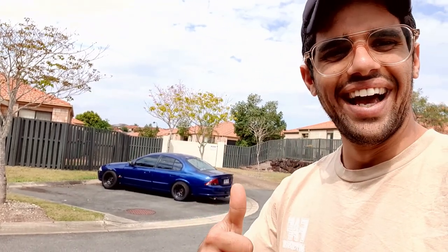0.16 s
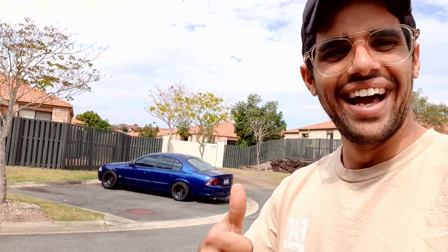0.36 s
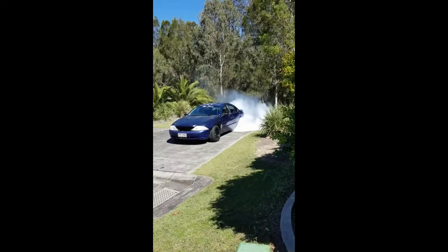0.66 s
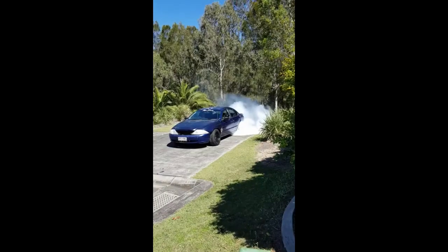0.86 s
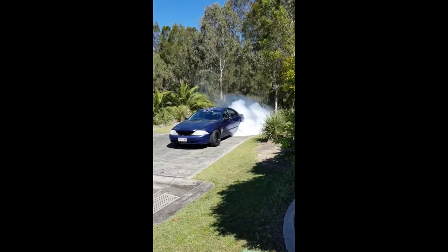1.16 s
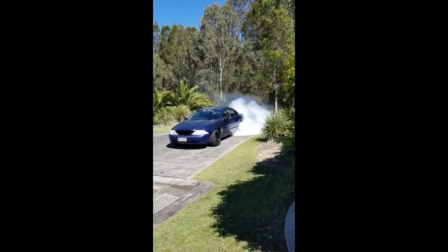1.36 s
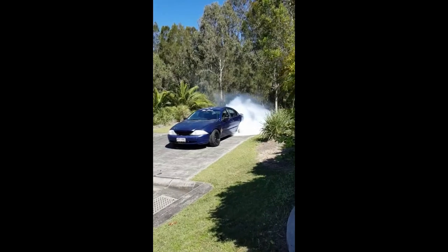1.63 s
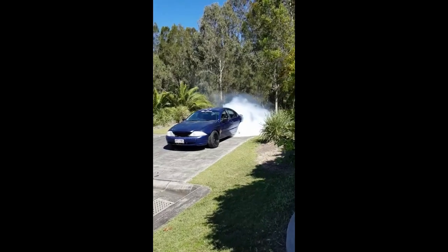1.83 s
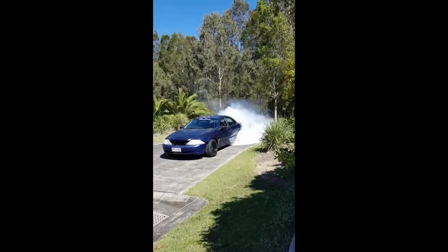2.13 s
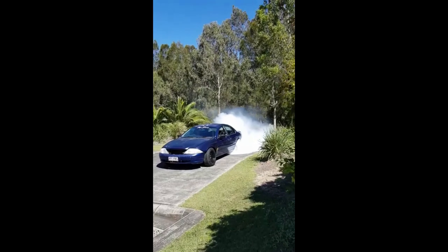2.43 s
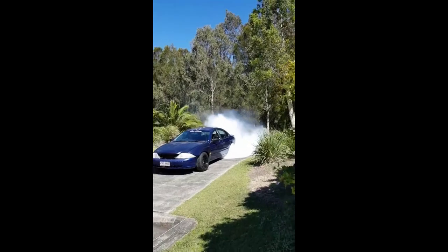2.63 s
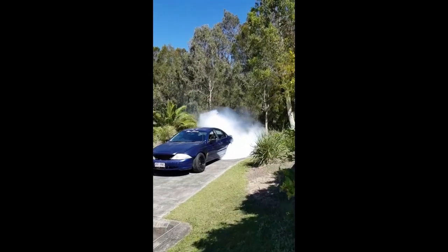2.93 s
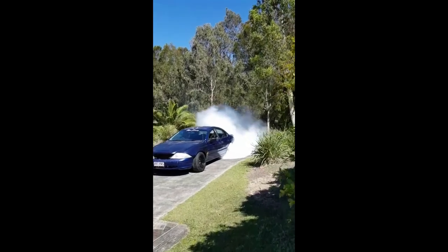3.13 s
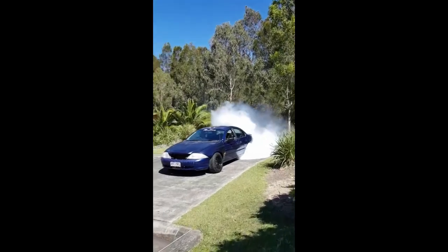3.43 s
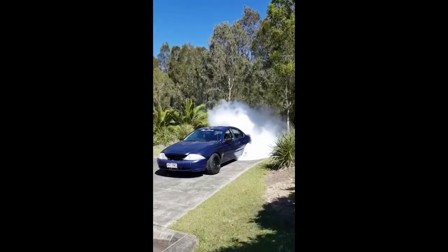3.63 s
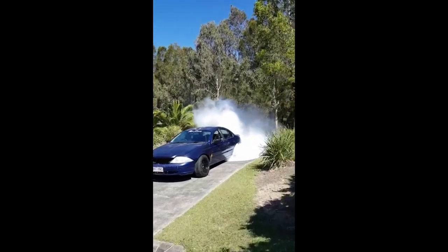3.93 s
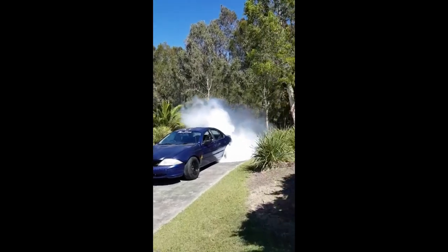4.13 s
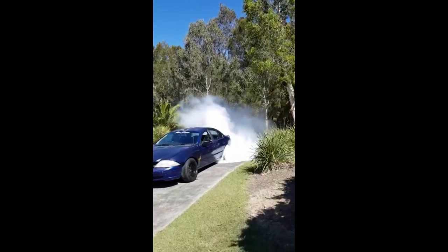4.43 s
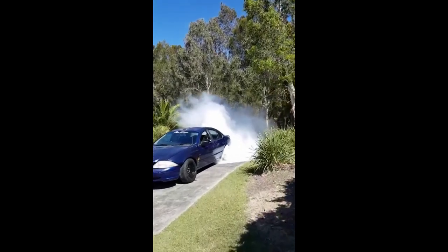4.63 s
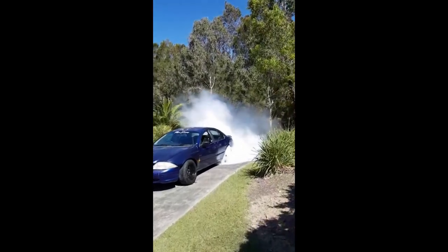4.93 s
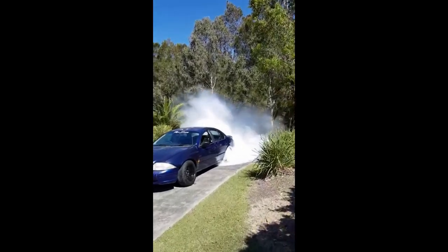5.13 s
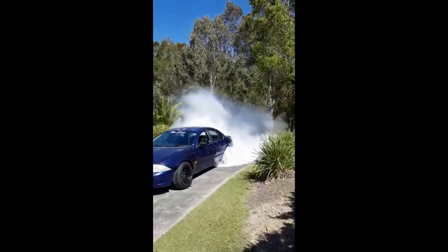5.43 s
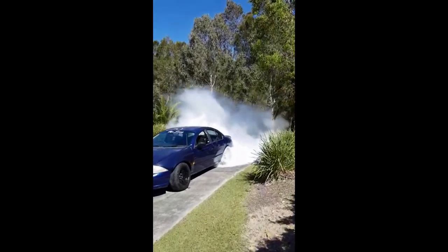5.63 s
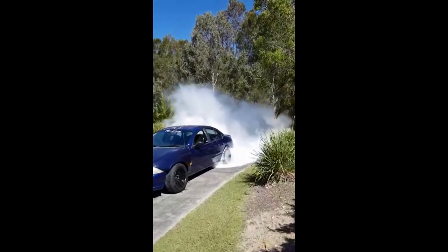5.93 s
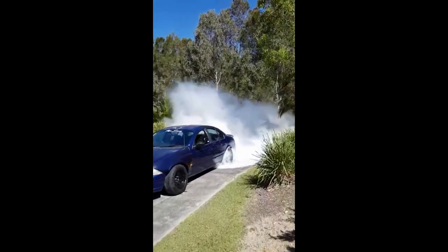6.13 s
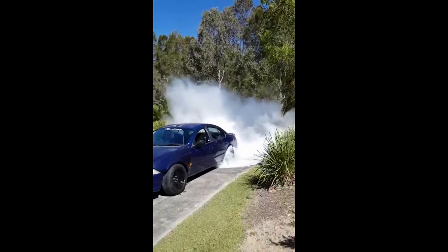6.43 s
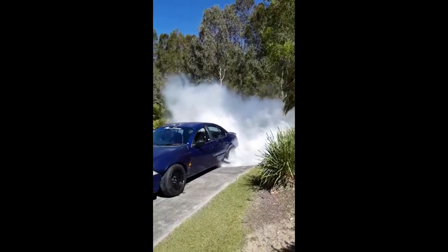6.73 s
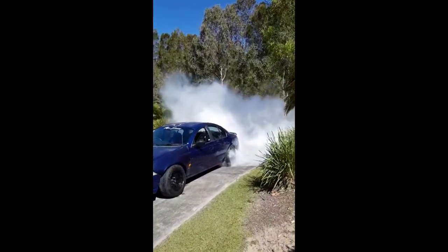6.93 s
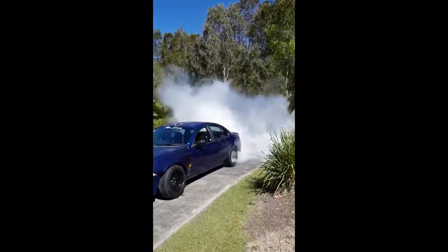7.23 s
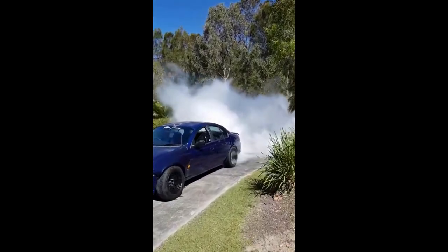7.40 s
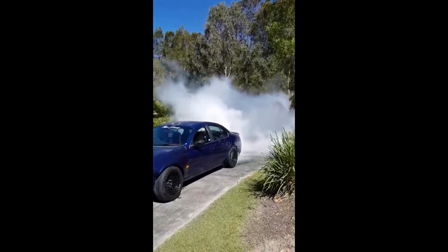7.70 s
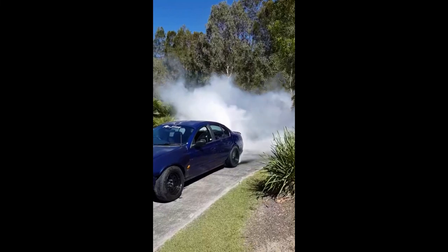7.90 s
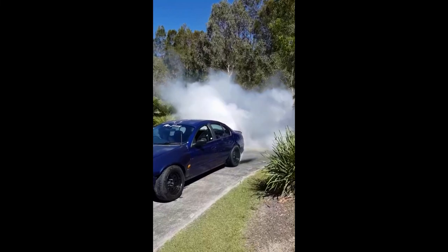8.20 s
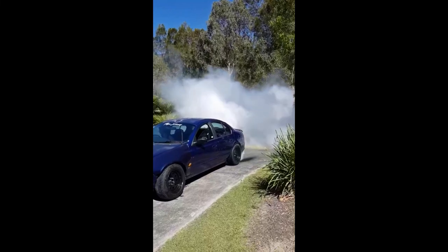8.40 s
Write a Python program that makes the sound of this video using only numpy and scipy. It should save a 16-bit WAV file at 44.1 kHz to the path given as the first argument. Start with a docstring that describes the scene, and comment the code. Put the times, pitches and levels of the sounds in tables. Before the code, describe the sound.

Sudden full-throttle six-cylinder drone and harsh spinning-tyre roar outdoors, held six seconds, then released into a tyre chirp, falling boom and soft low-rev chugging.

```python
"""On a concrete drive, heard from the lawn beside it, a six-cylinder saloon does a burnout.
A quiet street and a short silence give way suddenly to full revs: the exhaust is a sum of engine orders,
tyres and clatter are coloured noise, partly repeated each turn, and a breeze is low noise on the microphone.
The driver lifts, the tyres chirp as they grip, the exhaust booms as falling orders cross a resonance,
and the car creeps off just above idle with soft chuffs and the whirr of fan and belts."""
import sys
import numpy as np
from scipy import signal
from scipy.fft import rfft, irfft, next_fast_len
from scipy.io import wavfile
from scipy.ndimage import uniform_filter1d

SR = 44100
rng = np.random.default_rng(int(sys.argv[2]) if len(sys.argv) > 2 else 0)


def unload_audio(sound):
    """Save the sound as a 16-bit wav file, at the path given as the first command line argument."""
    columns = np.transpose(np.atleast_2d(sound))
    # keep every value between -1 and 1, then stretch to whole-number steps
    steps = np.round(np.clip(columns, -1, 1) * 32767)
    wavfile.write(sys.argv[1], SR, steps.astype(np.int16))


N = 377496
T = np.arange(N) / SR  # seconds
HZ = np.maximum(np.arange(N // 2 + 1) * SR / N, 1)  # frequency of each spectral bin
TOP_HZ = 13200
START_S, LIFT_S = .518, 6.4

# Spectrum of the quiet street: frequency_hz, gain_db
STREET_COLOUR = [(15, -39), (25, -3), (66, -1.5), (300, -21.5), (1410, -30.5), (2310, -32.5), (5480, -39.5),
                 (7910, -39), (9500, -52), (13000, -39)]
STREET_DB = -58
# Spectrum of the breeze: frequency_hz, gain_db
BREEZE_COLOUR = [(22, -44), (45, -5.5), (75, -2), (100, -4), (150, -8.5), (280, -18), (600, -49)]
# Gusts added to the breeze: centre_s, width_s, level_db
GUSTS = [(.72, 0.16, -30), (1.05, 0.044, -33), (1.5, 0.11, -37), (2.06, 0.14, -32), (2.95, 0.66, -39.5),
         (3.36, 0.1, -36.5)]
BREEZE_DB, CALMING_DB_PER_S = -38, 5.5  # level at the start, and its decline
# Soft bumps on the microphone, and last a small exhaust pop as the revs fall:
# centre_s, width_s, pitch_hz, level_db
BUMPS_AND_POP = [(0.05, 0.024, 48, -45), (0.081, 0.0012, 313, -40.5), (0.2025, 0.0014, 280, -45),
                 (0.212, 0.0016, 202, -44), (0.212, 0.0092, 84.8, -51), (1.74, 0.025, 63, -25),
                 (1.865, 0.0082, 281.5, -28), (1.885, 0.014, 138, -24), (2.02, 0.0083, 290.6, -22),
                 (2.035, 0.0086, 124, -20), (2.08, .016, 80.5, -25), (2.145, .012, 109, -35),
                 (2.28, 0.011, 103.6, -30), (2.54, 0.013, 115, -21), (2.645, 0.0062, 290, -28),
                 (3.17, 0.0093, 278, -26), (3.32, .016, 91, -28), (3.42, 0.013, 75, -33),
                 (7.075, 0.0049, 200, -42)]

# Fan and belts at low revs: time_s, level_db
FAN_LEVEL = [(7.0, -49), (7.35, -55), (7.75, -54), (8.05, -50), (8.3, -51.5), (8.56, -51.5)]
# Spectrum of fan and belts: frequency_hz, gain_db
FAN_COLOUR = [(100, -28), (170, -7.5), (330, -12.5), (570, -9), (900, -7.5), (2100, -8.5), (3300, -21.5),
              (4500, -14), (5600, -17.5), (6500, -24), (9500, -32.5), (12500, -22.5)]
# Tailpipe chuffs as the car is eased forward: time_s, level_db
CHUFF_LEVEL = [(7.1, -67), (7.66, -62.5), (7.75, -58), (7.87, -61), (8.02, -54.5), (8.15, -52), (8.3, -61),
               (8.56, -61)]

# Tyres slowing down: time_s, level_db
SPIN_DOWN_LEVEL = [(6.58, -24), (6.66, -30), (6.75, -31), (6.85, -32.5), (6.95, -35.5), (7.03, -43),
                   (7.1, -50), (7.25, -60)]
# Spectrum of the slowing tyres: frequency_hz, gain_db
SPIN_DOWN_COLOUR = [(90, -17), (280, 2), (500, -5), (900, -3.5), (1500, 2.5), (2300, -2.5), (3200, -5),
                    (4500, -8.5), (6500, -13.5), (9000, -23.5), (12500, -18.5)]
# Tyres biting, once at length and then in chirps: centre_s, width_s, pitch_hz, bandwidth_hz, level_db
CHIRPS = [(2.15, .35, 3200, 1000, -33.5), (6.53, .05, 3300, 2600, -33), (6.785, .022, 1950, 220, -37),
          (6.838, .02, 1760, 90, -29), (6.803, .016, 2900, 900, -36), (6.8, .012, 6700, 1300, -36.5),
          (6.83, .02, 7500, 400, -48), (6.92, .05, 1450, 550, -43)]

# Spectrum of tyres and engine bay: frequency_hz, gain_db
ROAR_COLOUR = [(90, -28), (200, -18), (300, -24.5), (440, -30.5), (900, -22.5), (1250, -20.5), (1650, -19),
               (2050, -22), (2650, -20.5), (2850, -21), (3100, -22), (3500, -26.5), (4300, -25.5),
               (5800, -30), (8000, -41), (10500, -40), (12500, -40.5)]
# Wheel arch and engine bay resonances: centre_hz, bandwidth_hz, relative_gain_db
BODY = [(1086, 60, -10), (1670, 90, -3.5), (1750, 81, -7), (2233, 170, 2.5), (2820, 67, 8),
        (3320, 65, -1.5), (3460, 70, 1), (3780, 77, 5), (4700, 100, -8), (5230, 52, -15), (6320, 130, -8),
        (7600, 47, -11)]
# Tyre judder, as stick and slip: cycles_per_wheel_turn, depth_fraction
JUDDER = [(5, 0.041), (6, 0.03), (11, 0.039)]
# Roar pulsing with unequal cylinders: multiple_of_cycle_rate, depth_fraction
LOPE = [(1, .05), (4, .07)]
WHEEL_TURNS_PER_CYCLE = .2611  # under load the tread comes round about ten times a second
ROAR_DB, RELEASE_S, RELEASE_DB_PER_S = -22.5, 6.444, 43  # steady under load, then dying away
# tyre hiss relative to the roar; it brightens once the rear wheel comes into view
HISS_DB, IN_VIEW_S, HISS_DB_PER_S = -9.5, 3.64, 1.22

# Engine speed off throttle, coasting, dragged to idle as the tyres grip, picking up: time_s, cycle_rate_hz
FALLING_REVS = [(6.4, 37.6), (6.45, 38.4), (6.5, 36.7), (6.56, 34.7), (6.62, 30.8), (6.72, 28.4),
                (6.77, 27), (6.8, 20.6), (6.865, 17.5), (6.936, 15.4), (7.02, 12.5), (7.16, 10.5),
                (7.3, 9.5), (7.68, 9.8), (7.86, 9.5), (7.97, 11), (8.16, 12.5), (8.32, 12.8), (8.56, 13.1)]
# At full throttle the revs creep up as the tyres heat, then sag; one cycle is six firings
TOP_CYCLE_HZ, TOP_AT_S, CLIMB_HZ, SAG_HZ_PER_S = 39.766, 4.15, 1.43, .13

# Exhaust orders off throttle, before the silencer: multiple_of_cycle_rate, relative_level_db
BOOM_ORDERS = [(2, -14), (3, -5.5), (4, -12), (5, -21), (6, 2), (7, -29), (8, -8.5), (9, -4.5), (10, -22),
               (12, -19)]
# Effort off throttle, sagging at idle and returning as the car pulls away: time_s, silencer_input_db
EFFORT = [(6.45, -23), (6.54, -19), (6.62, -18), (6.74, -17.5), (6.79, -23), (6.86, -22.5), (6.94, -29),
          (6.97, -17.5), (7.0, -16.8), (7.035, -26), (7.12, -26.5), (7.23, -27.5), (7.35, -42), (7.5, -41),
          (7.75, -31), (7.93, -30.5), (8.02, -28), (8.2, -23), (8.3, -24), (8.56, -27.5)]
# Weak firings that let the boom drop out briefly: centre_s, change_db
STUMBLES = [(6.575, -8), (6.785, -4), (7.07, -8), (7.175, -5), (7.68, -5), (7.905, -5)]
STUMBLE_WIDTH_S = 0.016
SILENCER_HZ, SILENCER_WIDTH_HZ = 85, 29
PULL_S, SMOOTHING_DB = 8.08, -4.5  # once it pulls again the cylinders fire more evenly

# Firing tone under load: time_s, level_db
DRONE_LEVEL = [(0.54, -17.5), (0.73, -17.5), (1.29, -22), (2.33, -20.5), (2.64, -15.5), (3.14, -20),
               (3.48, -16), (3.89, -17), (4.37, -15.5), (5.26, -21.5), (5.53, -18), (5.96, -20), (6.3, -19)]
# Unequal cylinders as the car slides round: multiple_of_cycle_rate, start_level_db, lift_level_db
OVERTONES = [(2, -47, -45), (7, -44.5, -49), (8, -53, -49), (9, -54, -43), (10, -43, -48.5), (12, -47, -44),
             (13, -50, -39.5), (14, -48.5, -48.5), (15, -51, -50), (18, -42, -40.5), (19, -46.5, -52.5),
             (20, -44.5, -47), (22, -46.5, -47.5), (23, -55, -46.5), (26, -58, -48), (27, -43.5, -45),
             (28, -42.5, -39.5), (29, -51, -44), (32, -44, -62), (33, -66, -44), (34, -48, -38.5),
             (35, -49, -49), (36, -38, -51), (38, -43, -55), (39, -42, -50), (42, -43, -40),
             (43, -50, -36.5), (45, -50, -44), (46, -52, -35), (47, -46, -54), (48, -37, -45)]
# Lobes and nulls as the tailpipe swings round:
# multiple_of_cycle_rate, start_level_db, centre_s, width_s, change_db
LOBES = [(3, -40, 3.82, 0.53, -10), (4, -43.5, 2.65, 0.75, 5.5), (16, -37, 4.37, 0.73, -8.5),
         (24, -46, 3.8, 0.71, 7)]
NEARING_DB_PER_S = 0.89  # the orders in LOBES grow as the car slides closer
OVERTONE_RELEASE_DB_PER_S = 58  # overtones and gas rush fade after the lift
# the closing throttle begins to drop the firing tone shortly before the lift
LIFT_DROP_DB, LIFT_TAKES_S, LIFT_LEAD_S = 17.5, 0.095, 0.073

# Phase between the two ports: frequency_hz, left_lead_rad
PORT_PHASE = [(0, 0), (300, 0), (900, -.3), (1200, -.8), (1800, -.4), (2200, -.9), (3400, -1.2),
              (4300, -2.9), (7500, -3.4), (13000, -7)]
# Level between the two ports: frequency_hz, left_minus_right_db
PORT_BALANCE = [(60, -.5), (240, -.3), (500, .8), (2000, 0), (4000, -.9), (7000, -1.5), (9500, 2),
                (12500, -1.5)]


def undb(db):
    """Logarithmic level: decibels become an amplitude ratio."""
    return 10 ** (np.asarray(db) / 20)


def unit(x):
    """Normalisation: scale to rms 1."""
    return x / np.sqrt(np.mean(x ** 2))


def curves(rows):
    """Linear interpolation: each column of a table becomes a control in time."""
    s, *columns = np.transpose(rows)
    return [np.interp(T, s, c) for c in columns]


def fade(at, length):
    """Linear ramp from 0 to 1 centred on a moment."""
    return np.clip((T - at) / length + .5, 0, 1)


def swell(at, width):
    """Gaussian envelope: a bell-shaped rise and fall around a moment."""
    return np.exp(-.5 * ((T - at) / width) ** 2)


def since(at):
    """Elapsed time in seconds after a moment, 0 before it."""
    return np.maximum(T - at, 0)


def walk(rate):
    """Random modulation: independent values at a given rate, joined by lines, with a spread near 1."""
    knots = rng.standard_normal(2000)
    return 1.394 * np.interp(T * rate, np.arange(len(knots)), knots)


def shape(points):
    """Spectral envelope: decibels interpolated along logarithmic frequency."""
    hz, db = np.transpose(points)
    return undb(np.interp(np.log(HZ), np.log(hz), db))


def resonance(hz, centre_hz, width_hz):
    """Simple resonance: its amplitude response, 1 at the centre."""
    return 1 / np.sqrt(1 + ((hz ** 2 - centre_hz ** 2) / (hz * width_hz)) ** 2)


def ringing(centre_hz, width_hz):
    """Damped oscillation: a complex response that starts at a blow and rings on after it."""
    return 1 / (1 + 1j * (HZ ** 2 - centre_hz ** 2) / (HZ * width_hz))


def colour(x, gain):
    """Linear filtering: a gain per frequency, then rms 1."""
    size = next_fast_len(N + 2000, True)
    gain = np.interp(np.arange(size // 2 + 1) * SR / size, HZ, gain)
    return unit(irfft(rfft(x, size) * gain, size)[..., :N])


def spread(mid, side, gain, least, apart_hz=4000):
    """Spatial coherence: two ports hear the bass more alike than the treble."""
    width = np.clip(least + HZ / (HZ + apart_hz), 0, 1)
    share = np.sqrt(np.sum((gain * width) ** 2) / np.sum(gain ** 2))
    difference = share * colour(side, gain * width)
    return colour(mid, gain) + difference * np.array([[1], [-1]])


def noise(gain, least=0.26):
    """Filtered random pressure: coloured stereo noise."""
    return spread(*rng.standard_normal((2, N)), gain, least)


def shimmer(x, depth_db, bin_count, frame_count):
    """Scintillation: moving air and shifting ground reflections make neighbouring frequencies swell together."""
    z = signal.stft(x, nperseg=1024)[2]
    field = rng.standard_normal(z.shape[-2:])
    field = uniform_filter1d(field, bin_count, axis=0)
    field = uniform_filter1d(field, frame_count, axis=1)
    swelling = z * undb(depth_db * unit(field))
    return unit(signal.istft(swelling, nperseg=1024)[1][..., :N])


def wobble(x, lag_s):
    """Doppler modulation: a wandering delay bends every resonance up and down."""
    return np.array([np.interp(T - lag_s, T, channel) for channel in x])


def each_cycle(wave, turns):
    """Periodicity: one waveform repeats with every rotation."""
    return np.interp(turns % 1, np.linspace(0, 1, len(wave) + 1), np.append(wave, wave[0]))


def kicks(turns):
    """Impulsive excitation: each firing kicks by its random departure from the average."""
    firing = np.floor(6 * turns).astype(int)
    strength = rng.uniform(-1, 1, 4000)[firing]
    return np.diff(firing, prepend=0) * strength / np.sqrt(np.gradient(turns))


def street():
    """Diffuse background: steady coloured noise that differs widely between the ports."""
    return noise(shape(STREET_COLOUR), least=0.76) * undb(STREET_DB)


def breeze():
    """Wind turbulence: low, uneven buffeting with gusts, partly different at each port."""
    strength = undb(BREEZE_DB - CALMING_DB_PER_S * since(START_S))
    strength = strength + sum(undb(db) * swell(s, width) for s, width, db in GUSTS)
    wind = noise(shape(BREEZE_COLOUR), least=0.73) * undb([[-3], [0]])  # weaker on the left
    return wind * strength * undb(1.5 * walk(17)) * (1 - fade(5.8, 0.5))


def bumps_and_pop():
    """Transient excitation: dull thuds from air and hand on the phone, and one soft exhaust pop."""
    out = 0
    for s, width, hz, db in BUMPS_AND_POP:
        tone = np.sqrt(2) * np.sin(2 * np.pi * (hz * T + rng.random()))
        out = out + tone * undb(db) * swell(s, width)
    return out * undb([[-14.0], [0]])  # weaker on the left


def fan(turns):
    """Broadband flow noise: fan and belts whirr over a faint hum, with one short hiss as the car moves off."""
    level_db, = curves(FAN_LEVEL)
    whirr = shimmer(noise(shape(FAN_COLOUR)), depth_db=3.0, bin_count=5, frame_count=12)
    throb = 1 + 0.08 * np.cos(6 * 2 * np.pi * turns)
    whirr = whirr * throb * undb(level_db)
    hum_hz = 272 * (1 + 0.0076 * walk(5.0))
    hum = np.sin(2 * np.pi * np.cumsum(hum_hz) / SR) * undb(-72 + 6 * since(6.1) + 2 * walk(10.0))
    hiss_colour = shape([(1500, -20), (4000, 2), (8000, -2), (13000, -4)])  # frequency_hz, gain_db
    hiss = noise(hiss_colour) * undb(-56) * swell(7.905, 0.023)
    return (whirr + hum) * fade(5.5, 0.28) + hiss


def chuff(turns, open_share=0.31, thump_db=3):
    """Pulsed flow: at low revs each firing leaves the pipe as a separate soft thump and puff."""
    level_db, = curves(CHUFF_LEVEL)
    # each puff decays over a share of the time between firings
    puffs = unit(np.exp(-(6 * turns % 1) / open_share) * undb(2 * walk(60)))
    gas_colour = shape([(200, -14), (500, -1), (1500, 6), (4000, -9)])  # frequency_hz, gain_db
    gas = noise(resonance(HZ, 565, 170) * gas_colour)
    thump = colour(kicks(turns), ringing(115, 140) ** 2)
    pulses = gas * (1 + puffs) / 2 + undb(thump_db) * thump
    return pulses * undb(level_db) * fade(7.1, .2)


def spin_down():
    """Sliding friction: the slowing tyres rub more and more softly until they roll."""
    level_db, = curves(SPIN_DOWN_LEVEL)
    scrub = shimmer(noise(shape(SPIN_DOWN_COLOUR)), depth_db=2.5, bin_count=5, frame_count=6)
    return scrub * undb(level_db) * fade(6.58, 0.14) * (1 - fade(7.2, 0.14))


def chirps():
    """Frictional squeal: biting tyres give swells of band-limited noise."""
    out = 0
    for s, length, hz, width, db in CHIRPS:
        out = out + noise(resonance(HZ, hz, width) ** 2) * undb(db) * swell(s, length)
    return out


def tyre_scrub(turns, gain):
    """Friction noise: rubber scrubs over concrete, pulsing with each firing while its resonances wander."""
    rubbing = wobble(noise(gain), .00006 * walk(90))
    pulse = 1 + 0.05 * np.cos(6 * 2 * np.pi * turns)
    return shimmer(rubbing * pulse, depth_db=1.6, bin_count=5, frame_count=10)


def engine_clatter(turns, gain):
    """Periodic noise: the engine repeats its clatter every cycle, easing as the nose swings away."""
    cycles = [each_cycle(rng.standard_normal(1100), turns) for _ in range(2)]
    # frequency_hz, gain_db
    tilt = shape([(700, -23), (1300, -8.0), (1700, 8.0), (3000, 1.5), (5000, 2.0), (10000, 3.5)])
    clatter = spread(*cycles, gain * tilt, least=0.032)
    clatter = shimmer(clatter, depth_db=1.5, bin_count=3, frame_count=40)
    return clatter * undb(-11.5 - 2 * fade(3.8, 0.54))


def tyre_tread(turns, gain):
    """Rotational periodicity: unevenly worn tread repeats its rasp every wheel turn."""
    wear = uniform_filter1d(rng.standard_normal(4200), size=90, mode="wrap")
    worn = undb(1.6 * unit(wear))
    wheel_turns = WHEEL_TURNS_PER_CYCLE * turns
    wheel = [each_cycle(worn * rng.standard_normal(len(worn)), wheel_turns) for _ in range(2)]
    tilt = shape([(600, -25), (1400, 1), (3500, 0.5), (6000, -1.5)])  # frequency_hz, gain_db
    tread = spread(*wheel, gain * tilt, least=0.03)
    return shimmer(tread, depth_db=2.2, bin_count=3, frame_count=40) * undb(-4.5)


def roar(turns):
    """Amplitude modulation: tyre and clatter noise pulses with the judder of the wheel and the engine's lope."""
    body = sum(undb(db) * resonance(HZ, hz, width) ** 2 for hz, width, db in BODY)
    gain = shape(ROAR_COLOUR) * (1 + undb(-3) * body)
    low = 1 / np.sqrt(1 + (HZ / 5000) ** 8)  # scrub below 5 kHz, hiss above
    out = undb(-2.23 + .5 * walk(45)) * tyre_scrub(turns, gain * low)
    out = out + engine_clatter(turns, gain) + tyre_tread(turns, gain)
    hiss = shimmer(noise(gain * np.sqrt(1 - low ** 2)), depth_db=4.0, bin_count=4, frame_count=6)
    out = out + undb(HISS_DB + HISS_DB_PER_S * since(IN_VIEW_S)) * hiss
    # the rubber sticks and slips several times each wheel turn
    wheel_turns = WHEEL_TURNS_PER_CYCLE * turns
    judder = 1 + sum(share * np.cos(2 * np.pi * (k * wheel_turns + rng.random())) for k, share in JUDDER)
    lope = 1 + sum(share * np.cos(2 * np.pi * (k * turns + rng.random())) for k, share in LOPE)
    level = undb(ROAR_DB - RELEASE_DB_PER_S * since(RELEASE_S))
    return out * judder * lope * level * (1 - fade(6.6, 0.045))


def revs():
    """Rotational kinematics: engine cycles per second climb and sag under load, then run down to idle."""
    to_go = np.clip((TOP_AT_S - T) / (TOP_AT_S - START_S), 0, 1)
    held = TOP_CYCLE_HZ - CLIMB_HZ * to_go ** 2 - SAG_HZ_PER_S * since(TOP_AT_S)
    falling, = curves(FALLING_REVS)
    return np.where(T < LIFT_S, held, falling)


def overrun(cycle_hz, turns, uneven_db=1.3, leak=0.003, putter_db=-12):
    """Forced resonance: orders boom as they slide through the silencer's peak; uneven firings make it putter."""
    orders = 0
    lumpy = undb(SMOOTHING_DB * fade(PULL_S, 0.11))
    for k, db in BOOM_ORDERS:
        evenness = lumpy if k % 6 else 1  # firing harmonics stay full
        level = evenness * undb(db + uneven_db * lumpy * walk(23))
        silencer = resonance(k * cycle_hz, SILENCER_HZ, SILENCER_WIDTH_HZ) ** 2 + leak
        orders = orders + level * silencer * np.exp(2j * np.pi * (k * turns + rng.random()))
    strength = np.sqrt(uniform_filter1d(np.abs(orders) ** 2, size=2200))
    putter = strength * lumpy * colour(kicks(turns), ringing(SILENCER_HZ, 55) ** 2)
    effort_db, = curves(EFFORT)
    effort_db = effort_db + sum(db * swell(s, STUMBLE_WIDTH_S) for s, db in STUMBLES)
    boom = np.sqrt(2) * orders.real + undb(putter_db) * putter
    return boom * undb(effort_db) * fade(LIFT_S, 0.22)


def firing_drone(turns):
    """Fundamental tone: six firings per cycle drone, dropping and fluttering more as the throttle closes."""
    level_db, = curves(DRONE_LEVEL)
    closed = np.minimum(since(LIFT_S - LIFT_LEAD_S) / LIFT_TAKES_S, 1)
    flutter_db = (0.33 + 3 * closed) * walk(70)
    tone = np.sqrt(2) * np.sin(6 * 2 * np.pi * turns)
    return tone * undb(level_db - LIFT_DROP_DB * closed + flutter_db) * (1 - fade(6.71, 0.055))


def exhaust_comb(turns, jitter_turns=.0012):
    """Harmonic series: unequal cylinders add multiples of the cycle rate, each wavering in level and phase."""
    slid = np.minimum(since(START_S) / (LIFT_S - START_S), 1)
    levels = [(k, first_db + (last_db - first_db) * slid) for k, first_db, last_db in OVERTONES]
    for k, db, at, width, change_db in LOBES:
        levels.append((k, db + NEARING_DB_PER_S * since(START_S) + change_db * swell(at, width)))
    comb = 0
    for k, db in levels:
        angle = 2 * np.pi * (turns + jitter_turns * walk(60))
        tone = np.sqrt(2) * np.sin(k * angle + rng.uniform(0, 2 * np.pi))
        comb = comb + tone * undb(db + 0.8 * walk(14) + 1.5 * walk(1.59))
    return comb


def exhaust(turns):
    """Superposition: under load the firing drone joins an overtone comb and the noise of gas rushing out."""
    rush = noise(resonance(HZ, 520, 450) ** 2) * undb(-46.5 + 1.44 * since(START_S))
    # off throttle the overtones slide down with the revs as they die away
    release = undb(-OVERTONE_RELEASE_DB_PER_S * since(LIFT_S))
    return firing_drone(turns) + (exhaust_comb(turns) + rush) * release


def ports(x):
    """Diffraction and delay: the phone's body shades and delays the car differently for each port."""
    size = next_fast_len(N + 2000, True)
    hz = np.arange(size // 2 + 1) * SR / size
    phase = np.interp(hz, *np.transpose(PORT_PHASE))
    balance_db = np.interp(hz, *np.transpose(PORT_BALANCE))
    half = np.array([[.5], [-.5]])  # left and right share each difference equally
    response = np.exp(1j * half * phase) * undb(half * balance_db)
    return irfft(rfft(x, size) * response, size)[:, :N]


def scene():
    """Superposition of sources: the quiet street, a short silence, then all at once the car and the breeze."""
    background = street() * (1 - fade(.444, .004)) + bumps_and_pop()
    cycle_hz = revs()
    turns = np.cumsum(cycle_hz * (1 + 0.00078 * walk(25))) / SR
    tyres = roar(turns) + spin_down() + chirps()
    engine = fan(turns) + chuff(turns) + overrun(cycle_hz, turns) + exhaust(turns)
    return background + (breeze() + ports(tyres + engine)) * fade(START_S, 0.0037)


def record(dry):
    """Low-pass filtering: the phone cuts the top."""
    return signal.sosfilt(signal.ellip(10, .2, 80, TOP_HZ, fs=SR, output="sos"), dry)


dry = scene()
out = record(dry)
unload_audio(out)
```